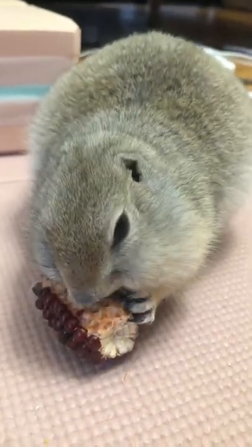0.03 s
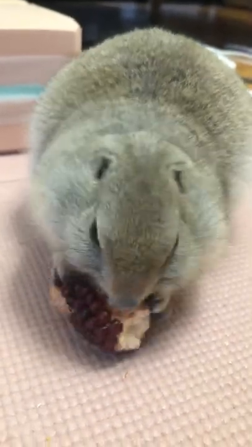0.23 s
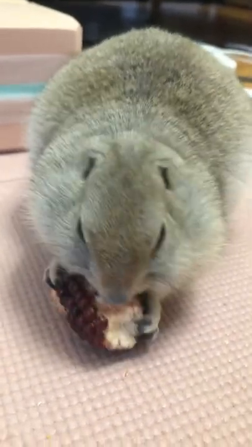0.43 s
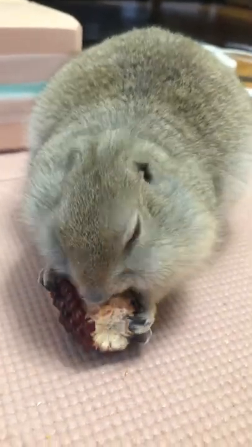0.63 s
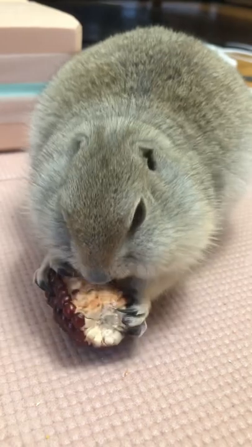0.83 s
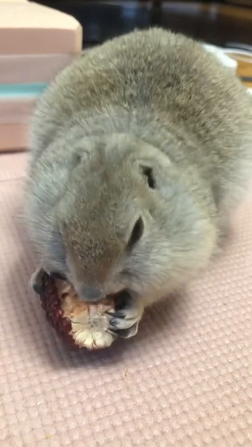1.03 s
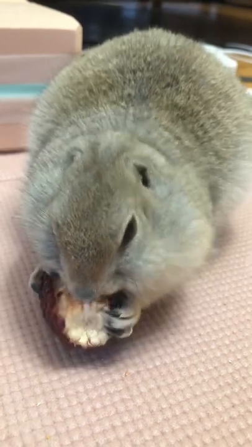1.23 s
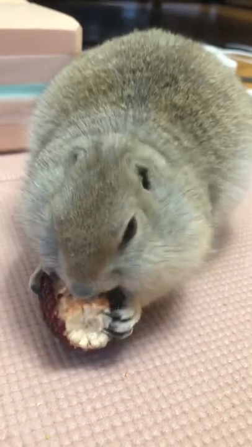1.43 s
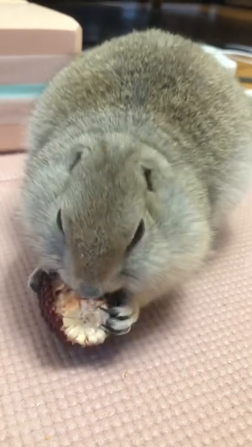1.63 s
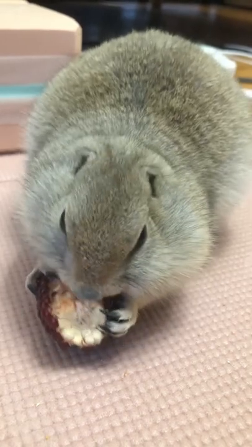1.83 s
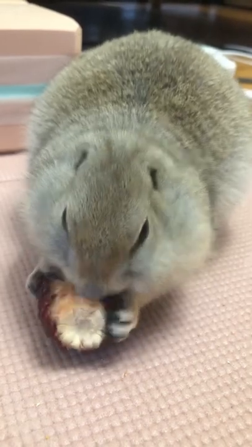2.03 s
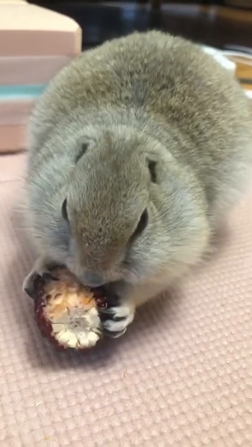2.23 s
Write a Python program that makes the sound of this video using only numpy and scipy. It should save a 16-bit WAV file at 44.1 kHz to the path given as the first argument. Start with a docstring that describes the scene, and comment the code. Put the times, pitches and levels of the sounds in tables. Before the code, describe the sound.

A squirrel gnaws a dried corn cob close by, with bright, crackly scraping and thin ticks. The sharpest snaps come at about 0.3 and 0.6 seconds. After a brief lull, the gnawing gets busier from 1 second, with firm bites knocking the cob near 1.2, 1.4, 1.6 and 2 seconds. Faint rustling of paws and crumbs and a low room rumble, hum and hiss lie underneath.

```python
"""A squirrel gnawing corn

A ground squirrel gnaws a piece of dried corn cob on a mat, close by in a quiet room.
Its teeth scrape off a dense crackle, hard bits snap with sharp ticks, and firm bites knock the cob.
Paws and crumbs rustle faintly. Under it all lie a low room rumble, a faint hum and hiss."""
import sys
import numpy as np
from scipy import signal
from scipy.fft import rfft, irfft, next_fast_len
from scipy.io import wavfile
from scipy.ndimage import map_coordinates

SR = 44100
rng = np.random.default_rng(int(sys.argv[2]) if len(sys.argv) > 2 else 0)


def unload_wav(signal):
    """Save mono or channel-first audio to the path in sys.argv[1] as 16-bit WAV at rate SR, clipped to [-1, 1]."""
    wavfile.write(
        sys.argv[1],
        SR,
        np.round(np.clip(np.atleast_2d(signal).T, -1, 1) * 32767).astype(np.int16),
    )


N = 101429
T = np.arange(N) / SR

# Strokes of the teeth: loudest_s, rise_s, fall_s, level_db, pitch_hz, through_cob_db
TOOTH_STROKES = [(0.044, 0.048, 0.059, -59.5, 9000, -7), (0.12, 0.0025, 0.0099, -50, 7960, -5),
                 (0.14, 0.038, 0.017, -50, 12800, -6), (.226, 0.051, 0.048, -53.5, 11500, -5.5),
                 (0.258, 0.012, 0.032, -44, 10400, -22), (0.373, 0.023, 0.022, -59.5, 10100, 7.5),
                 (0.528, 0.024, 0.038, -60, 9500, -8), (.634, 0.012, 0.019, -42.5, 9700, -15),
                 (0.673, 0.0081, 0.014, -55.5, 9000, -23), (0.766, 0.043, 0.01, -65, 5100, -7),
                 (.978, 0.054, 0.037, -55.5, 9900, -6), (1.013, .01, 0.015, -50, 11100, -6),
                 (1.116, 0.018, 0.014, -53, 9400, -25), (1.153, 0.017, .012, -46, 9800, -15),
                 (1.205, 0.089, 0.034, -57.5, 9500, -4.5), (1.238, 0.0088, 0.066, -54, 8400, -5),
                 (1.276, 0.0096, 0.03, -43, 9100, -11.5), (1.315, 0.034, 0.025, -55.5, 9400, -4),
                 (1.396, 0.0093, 0.092, -60, 9500, 3.5), (1.431, 0.0033, 0.012, -39.5, 9200, -16),
                 (1.549, 0.018, 0.046, -51.5, 10300, -14.5), (1.593, 0.014, 0.02, -48, 9900, -9),
                 (1.645, 0.0071, 0.018, -42, 10100, -8), (1.77, 0.04, 0.048, -56, 10900, -19),
                 (1.821, 0.013, 0.021, -52.5, 11200, -17), (1.909, 0.031, 0.029, -53, 10900, -39),
                 (1.943, 0.03, 0.062, -52, 9550, -6), (1.995, 0.011, 0.031, -51, 9400, 3),
                 (2.025, 0.012, 0.021, -43.5, 8900, -12.5), (2.11, 0.016, 0.017, -57.5, 9400, 1.5),
                 (2.241, 0.0091, 0.017, -58.5, 8800, 5.5)]
# How well the cob passes on each pitch: pitch_hz, gain_db
COB_TONE = [(150, -42), (280, 10.5), (480, 9), (800, -4), (1100, 9.5), (1600, -2.5), (2800, -11.5),
            (4300, -8.5), (7000, -33), (16000, -85)]

def scrapes():
    """Scraping teeth make pops, fine crackle and rubbing, partly heard through the cob."""
    out, t = np.zeros(N), np.arange(-SR // 10, SR // 10) / SR
    for loudest_s, rise_s, fall_s, level_db, pitch_hz, through_cob_db in TOOTH_STROKES:
        force = amp(level_db - 20 * np.maximum(-t / rise_s, t / fall_s))  # 20 dB up, then down
        pops = 0.65 * tiny_breaks(per_s=300, spread_db=1.5, size=len(t))
        crackle = tiny_breaks(per_s=3000, spread_db=4, size=len(t))
        rubbing = 0.23 * rng.standard_normal(len(t))
        grit = unit(pops + crackle + rubbing)
        direct = brittle(grit, pitch_hz, octaves=0.73)
        cob = unit(filtered(grit, lambda hz: tone_curve(COB_TONE, hz)))
        add(out, loudest_s + t[0], force * (direct + amp(through_cob_db) * cob))
    return out


# Hard bits breaking off: start_s, level_db, pitch_hz, splinter_db (compared with the tick)
HARD_SNAPS = [(0.0646, -34.5, 8050, -18), (0.096, -34, 9200, -27), (0.132, -32, 13000, -25),
              (.135, -29, 13100, -27), (0.1388, -31, 13400, -29), (0.2272, -30, 12100, -5.5),
              (0.2552, -30, 12800, 1), (0.2608, -6, 10670, -17), (0.2663, -20, 12000, -15.5),
              (0.3678, -37, 10100, -6.5), (0.5777, -11.5, 11340, -17.5), (0.6231, -13.5, 9600, -25),
              (0.633, -24, 9800, -28), (0.8054, -30, 8600, -15), (0.99, -33.5, 9500, -21),
              (1.013, -39, 12100, -23), (1.0441, -38.5, 8000, -13.5), (1.1573, -32.5, 8500, -10),
              (1.2245, -20, 8000, -5.5), (1.2556, -36, 9500, -24), (1.2676, -31, 8750, -20),
              (1.2755, -28, 9100, -11), (1.2837, -25, 8900, -21), (1.3248, -34, 9300, -24),
              (1.4228, -30, 9450, -26), (1.549, -35, 11100, -24), (1.559, -37, 9600, -28),
              (1.5965, -29, 10300, -25), (1.603, -29.5, 9800, -20), (1.6422, -27.5, 12700, -11),
              (1.6796, -36, 8000, -11), (1.8026, -21.5, 9100, -20), (1.8442, -34, 10100, -6),
              (1.849, -22, 9800, -24), (1.91, -18, 10600, -26), (1.936, -31, 9600, -18),
              (1.9477, -21.5, 9500, -19), (1.9906, -25, 9700, -3.5), (2.0037, -38, 9500, -16)]

def snaps():
    """A hard bit breaks with one thin, sharp tick, then splinters for a moment."""
    out, t = np.zeros(N), np.arange(-64, 1024) / SR
    tick_width_s, splinter_fade_s = 0.00009, 0.0095
    for start_s, level_db, pitch_hz, splinter_db in HARD_SNAPS:
        tick = np.exp(-(t / tick_width_s) ** 2) * np.cos(2 * np.pi * pitch_hz * t)
        # Small shards give off little low sound.
        tick = filtered(tick, lambda hz: 1 - 1 / (1 + (hz / (0.47 * pitch_hz)) ** 3.2))
        splinters = brittle(rng.standard_normal(len(t)), pitch_hz, octaves=0.52)
        splinters *= (t > 0) * amp(-60 * np.abs(t) / splinter_fade_s)
        add(out, start_s + t[0], amp(level_db) * (tick + amp(splinter_db) * splinters))
    return out


# Firm bites: start_s, thump_db, knock_db, crack_db, crack_pitch_hz, crack_width_octaves
FIRM_BITES = [(0.0667, -67, -62, -52.5, 4940, 0.56), (0.095, -57, -43, -50.5, 4130, 0.68),
              (0.226, -72, -71, -42, 3000, 0.63), (0.2611, -64, -70, -35, 2840, 0.33),
              (0.368, -46, -56, -41.5, 2200, 0.66), (0.5778, -51, -46, -34.5, 4260, 0.2),
              (.623, -35.5, -32.5, -35, 2300, 0.76), (0.8056, -68, -64, -36, 5280, 0.13),
              (1.016, -43, -47, -74, 4200, .4), (1.2248, -35.5, -32, -32, 4400, 1.6),
              (1.276, -38, -33.5, -53, 4500, 0.99), (1.396, -41.5, -53, -68, 4000, 0.52),
              (1.4303, -40, -37.5, -39.5, 4250, 0.32), (1.594, -40.5, -49, -52, 4300, 0.66),
              (1.642, -38, -36, -41.5, 4130, 0.34), (1.679, -52, -68, -51, 4780, .25),
              (1.948, -39.5, -43, -42, 4000, 0.75), (1.9903, -30, -29.5, -30.5, 3200, .6)]
# The held cob's low, middle and high ringing notes: pitch_hz, gain_db, fade_s (time to drop 60 dB)
THUMP_NOTES = [(228.3, 2.5, 0.057), (293.4, 6.5, 0.044)]
KNOCK_NOTES = [(665, -8.5, 0.015), (880, -4.5, 0.016), (1133, -4.5, 0.015)]
CRACK_NOTES = [(1670, -3, 0.0078), (2530, -3.5, 0.0062), (3350, -2, 0.0065), (4000, -3.5, 0.0059),
               (4590, 0.5, 0.0059), (5800, -2, 0.0059), (6800, 9, 0.0071)]

def bites():
    """The teeth break through: fibres tear, and the cob cracks, knocks and thumps in the paws."""
    out, t = np.zeros(N), np.arange(SR // 10) / SR
    crack_rise_s, thump_rise_s, fibre_fade_s = 0.0001, 0.0067, 0.013
    for start_s, thump_db, knock_db, crack_db, pitch_hz, octaves in FIRM_BITES:
        fibres = unit(filtered(rng.standard_normal(len(t)), lambda hz: band(hz, pitch_hz, octaves)))
        fibres *= amp(-28 - 60 * t / fibre_fade_s)
        # Each crack mostly stirs the notes near its own pitch.
        stirred = [(hz, db + 20 * np.log10(band(hz, pitch_hz, octaves) + 1e-20), fade_s)
                   for hz, db, fade_s in CRACK_NOTES]
        crack = (ring(stirred, t) + fibres) * (1 - np.exp(-t / crack_rise_s))
        thump = ring(THUMP_NOTES, t) * (1 - np.exp(-t / thump_rise_s))
        knock = ring(KNOCK_NOTES, t)
        add(out, start_s, amp(crack_db) * crack + amp(knock_db) * knock - amp(thump_db) * thump)
    return out


def ring(notes, t):
    """The cob's notes start together and die away; the grip shifts each pitch a little."""
    out = np.zeros(len(t))
    for k, (pitch_hz, gain_db, fade_s) in enumerate(notes):
        shifted_hz = pitch_hz * (1 + rng.normal(0, 0.03))
        direction = (-1) ** k  # neighbouring notes swing opposite ways
        out += direction * amp(gain_db - 60 * t / fade_s) * np.sin(2 * np.pi * shifted_hz * t)
    return out


def tiny_breaks(per_s, spread_db, size):
    """Crackle: tiny breaks come at random, each a brief ping with its own pitch and strength."""
    t = np.arange(96) / SR
    low_hz, high_hz, decay_s = 2000, 16000, 0.00016
    chance, pitch, luck, phase = rng.random((4, size))
    starts = np.flatnonzero(chance < per_s / SR)[:, None]
    hz = low_hz + pitch[starts] * (high_hz - low_hz)
    strength = amp(spread_db * np.minimum(-np.log(luck[starts]), 4))  # many weak, a few strong
    pings = strength * np.sin(2 * np.pi * (hz * t + phase[starts])) * np.exp(-t / decay_s)
    positions = starts + np.arange(len(t))
    return unit(np.bincount(positions.ravel(), pings.ravel(), size)[:size])  # add up all pings


# The tone of dry corn breaking: pitch_hz, gain_db
BRITTLE_TONE = [(300, -32), (1500, 1), (3000, 5.5), (5000, -0.5), (8000, 0.5), (11300, 0.5), (12700, -2.5),
                (14000, 2), (16000, 1.5)]

def brittle(x, pitch_hz, octaves):
    """Gives x the bright sound of something dry breaking, lifted around pitch_hz."""
    return unit(filtered(x, lambda hz: tone_curve(BRITTLE_TONE, hz) * (0.12 + band(hz, pitch_hz, octaves))))


# How loud the rustle is as time passes: time_s, level_db
RUSTLE_LEVELS = [(0, -67), (.3, -63), (.45, -68), (.7, -66.5), (.86, -69.5), (1.15, -67.5), (1.6, -63),
                 (2.0, -70), (2.1, -72), (2.3, -70)]

def rustle():
    """Paws and crumbs rustle faintly the whole time."""
    crumbs = tiny_breaks(per_s=2200, spread_db=4.5, size=N)
    return level_curve(RUSTLE_LEVELS) * brittle(crumbs, pitch_hz=9250, octaves=0.73)


def room_echo(x):
    """Nearby surfaces add a short, weak echo."""
    t = np.arange(SR // 4) / SR
    echo_db, fade_s = -20.5, 0.037
    tail = rng.standard_normal(len(t)) * amp(-60 * t / fade_s)
    return x + amp(echo_db) * signal.fftconvolve(x, tail / np.linalg.norm(tail))[:N]


# The tone of the room's rumble and hiss: pitch_hz, gain_db
ROOM_NOISE = [(15, -39), (25, -28), (84, 0.5), (161, -5), (217, -2), (277, -5), (344, -4.5), (416, -12.5),
              (489, -19), (936, -17), (1100, -22), (1400, -23.5), (1790, -30.5), (2350, -31), (2550, -35.5),
              (3520, -36), (4870, -38), (7920, -39.5), (16000, -43.5)]
# How the deep rumble swells and dips: time_s, gain_db
RUMBLE_SWELLS = [(0, 4.5), (.3, 7.5), (.42, -16), (.56, -1), (1.0, 1), (1.6, 0.5), (1.8, -9), (2.3, -6)]
# The notes of the hum: pitch_hz, level_db
HUM_NOTES = [(77, -68.5), (114, -63), (221, -64), (1373, -80)]

def room_background():
    """The quiet room: a shifting rumble, a steady hiss and a slightly wavering hum."""
    noise_db, rumble_hz = -53.5, 103
    noise = amp(noise_db) * unit(filtered(rng.standard_normal(N), lambda hz: tone_curve(ROOM_NOISE, hz)))
    rumble = filtered(noise, lambda hz: np.exp(-(hz / rumble_hz) ** 2))
    out = noise - rumble + rumble * level_curve(RUMBLE_SWELLS)
    for pitch_hz, level_db in HUM_NOTES:
        drift = map_coordinates(rng.standard_normal(32), [T * 6], mode="mirror")  # 6 values a second
        out += amp(level_db) * np.sqrt(2) * np.sin(2 * np.pi * pitch_hz * T + 0.65 * drift)
    return out


def amp(db):
    """Turns decibels into a number to multiply by."""
    return 10 ** (np.asarray(db) / 20)


def unit(x):
    """Scales x to an average strength (rms) of 1."""
    return x / np.sqrt(np.mean(x ** 2) + 1e-20)


def level_curve(points):
    """Joins (time_s, db) points into a gain for every moment."""
    return amp(np.interp(T, *np.transpose(points)))


def tone_curve(points, hz):
    """Joins (pitch_hz, db) points into a gain for every pitch."""
    pitch_hz, db = np.transpose(points)
    return amp(np.interp(np.log(hz + 1), np.log(pitch_hz + 1), db))


def band(hz, centre_hz, octaves):
    """A bell-shaped gain, highest at centre_hz."""
    return np.exp(-0.5 * (np.log2((hz + 1) / centre_hz) / octaves) ** 2)


def filtered(x, gain):
    """Turns each pitch in x up or down by gain(hz)."""
    size = next_fast_len(len(x) + 4096)
    return irfft(rfft(x, size) * gain(np.fft.rfftfreq(size, 1 / SR)), size)[:len(x)]


def add(track, start_s, x):
    """Mixes x into the track from start_s on."""
    i = round(start_s * SR)
    x = x[max(-i, 0):]
    part = track[max(i, 0):][:len(x)]
    part += x[:len(part)]


def scene():
    """The gnawing in its room, on one channel."""
    squirrel = snaps() + bites() + scrapes() + rustle()
    return (room_echo(squirrel) + room_background())[None]


def record(dry):
    """Cuts away the very highest treble."""
    top_hz, edge_hz = 16100, 800
    return np.array([filtered(x, lambda hz: np.clip((top_hz - hz) / edge_hz + 0.5, 0, 1)) for x in dry])


dry = scene()
out = record(dry)
unload_wav(out)
```